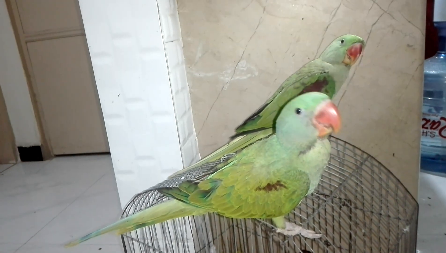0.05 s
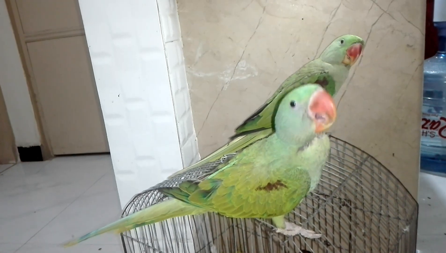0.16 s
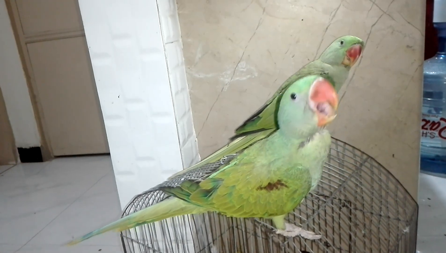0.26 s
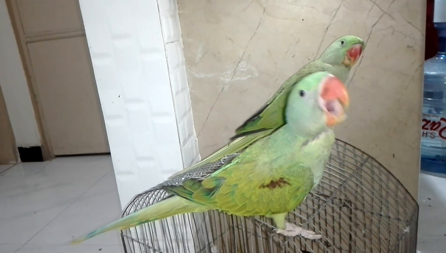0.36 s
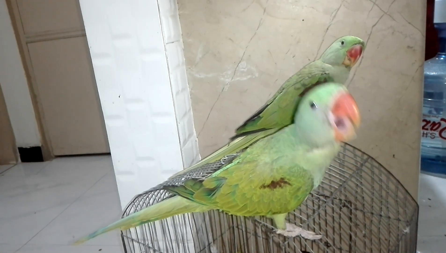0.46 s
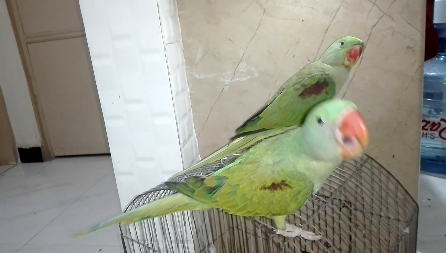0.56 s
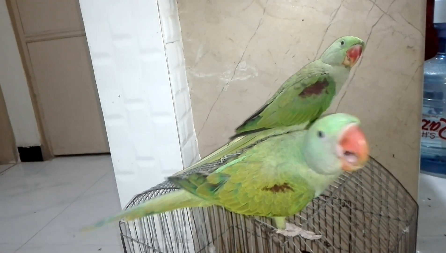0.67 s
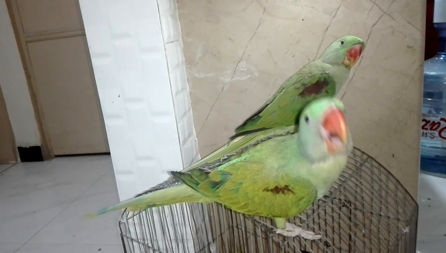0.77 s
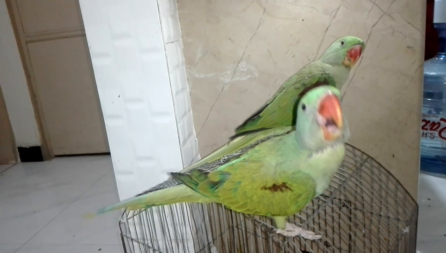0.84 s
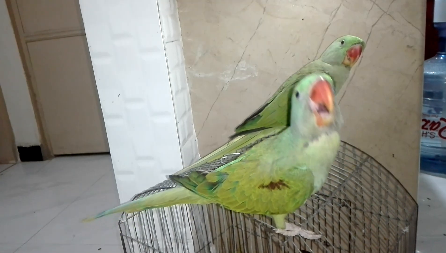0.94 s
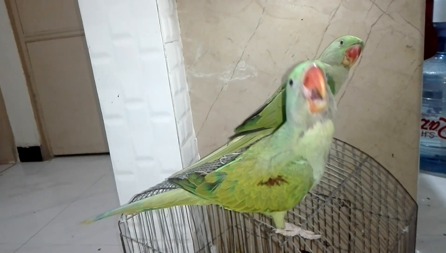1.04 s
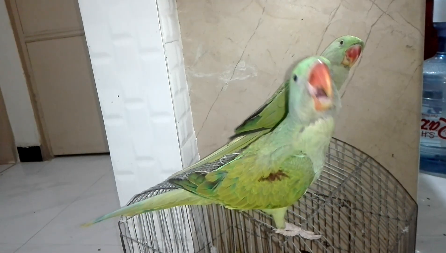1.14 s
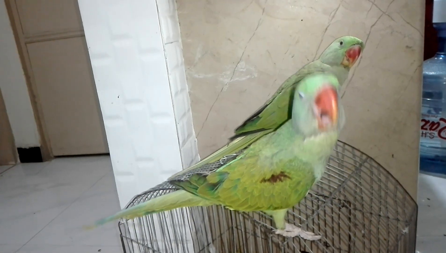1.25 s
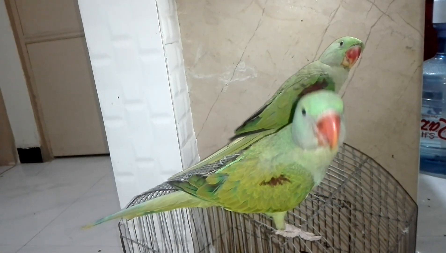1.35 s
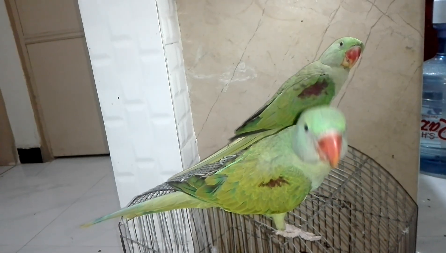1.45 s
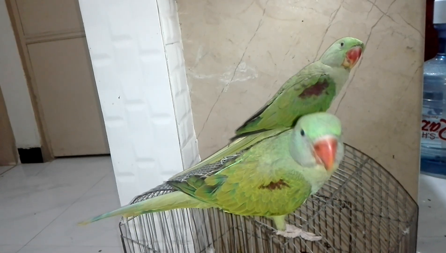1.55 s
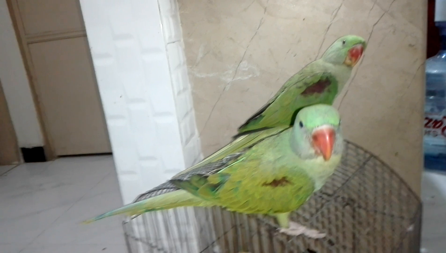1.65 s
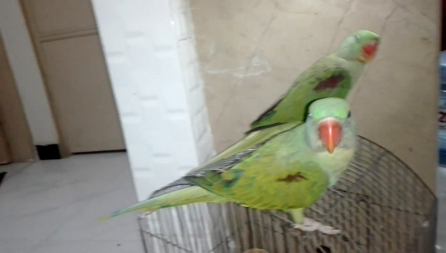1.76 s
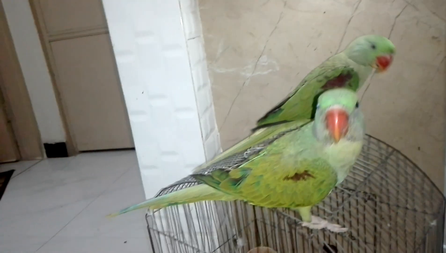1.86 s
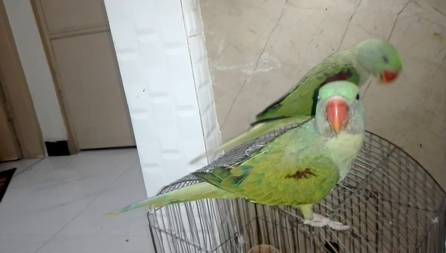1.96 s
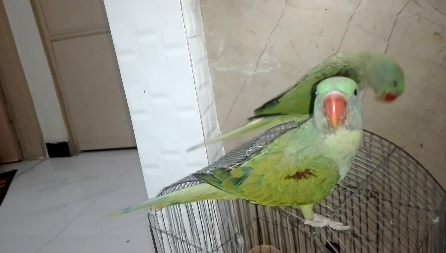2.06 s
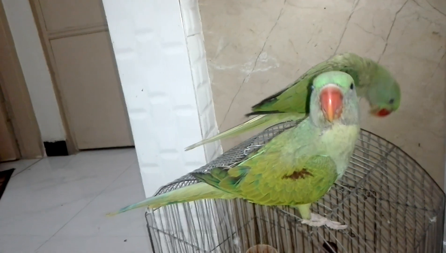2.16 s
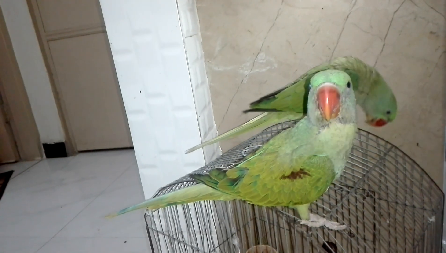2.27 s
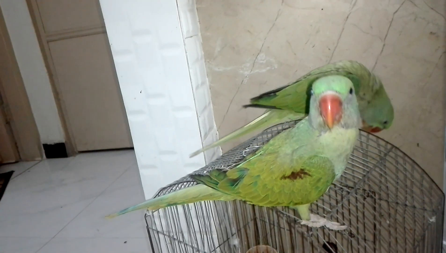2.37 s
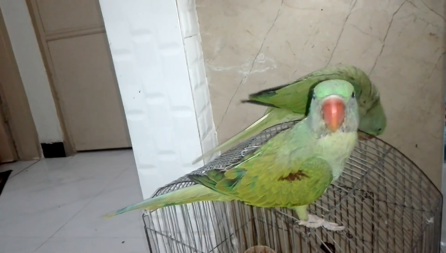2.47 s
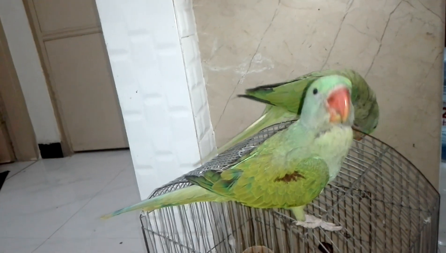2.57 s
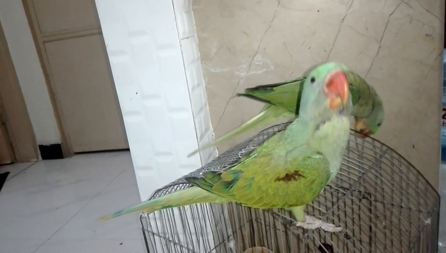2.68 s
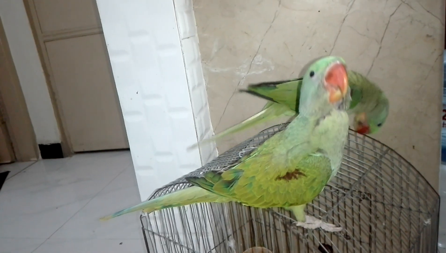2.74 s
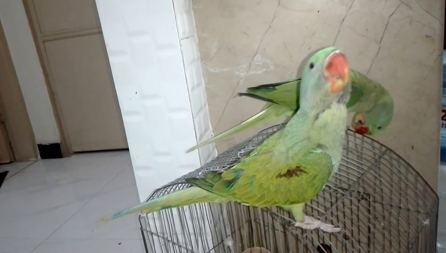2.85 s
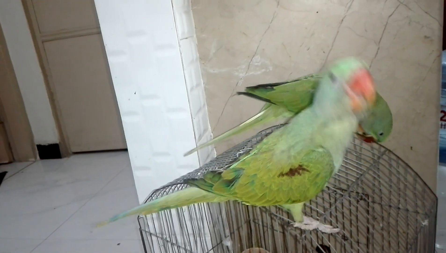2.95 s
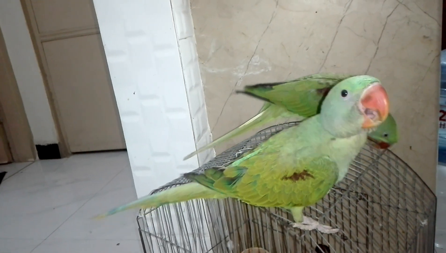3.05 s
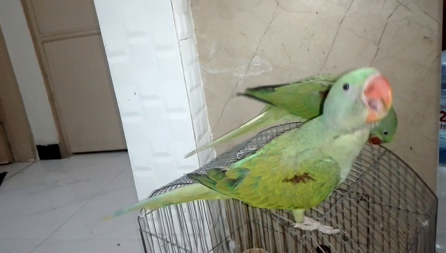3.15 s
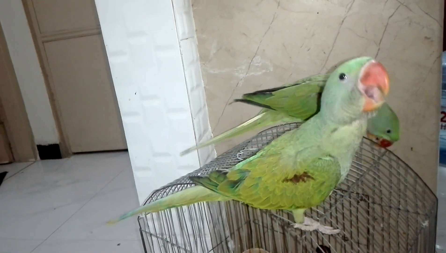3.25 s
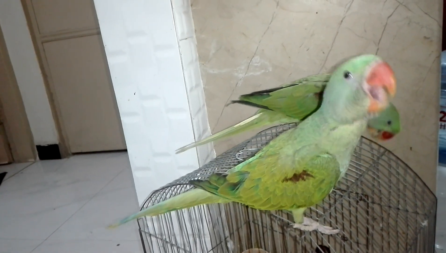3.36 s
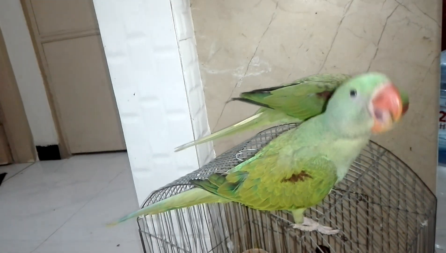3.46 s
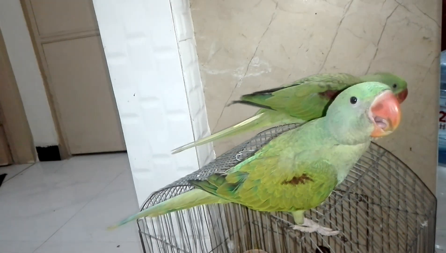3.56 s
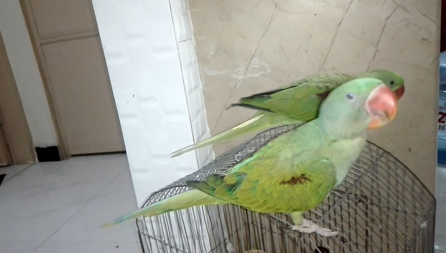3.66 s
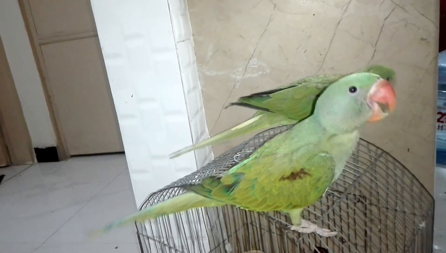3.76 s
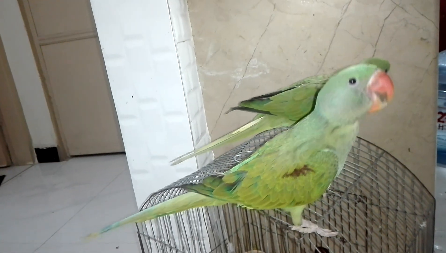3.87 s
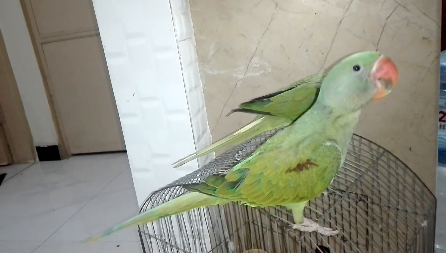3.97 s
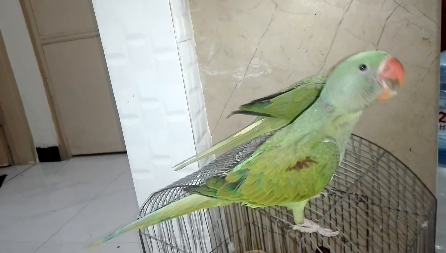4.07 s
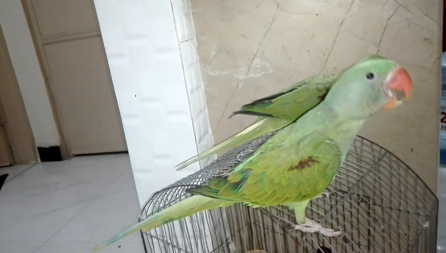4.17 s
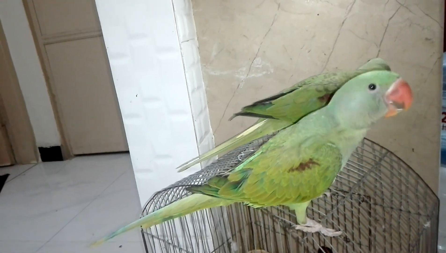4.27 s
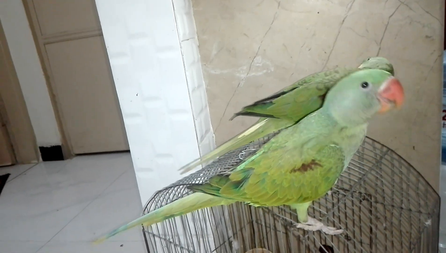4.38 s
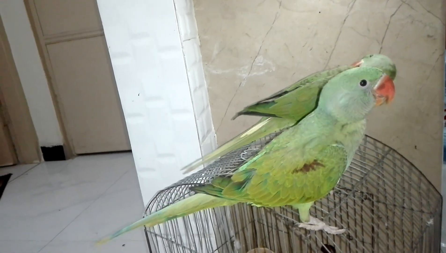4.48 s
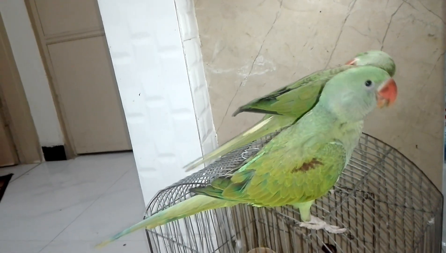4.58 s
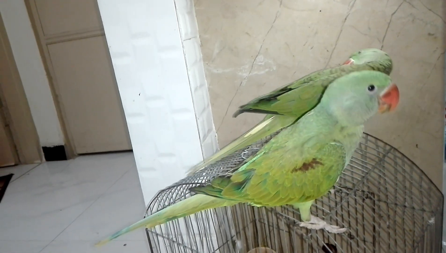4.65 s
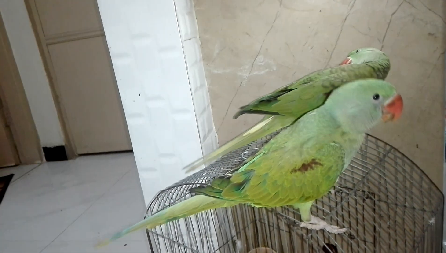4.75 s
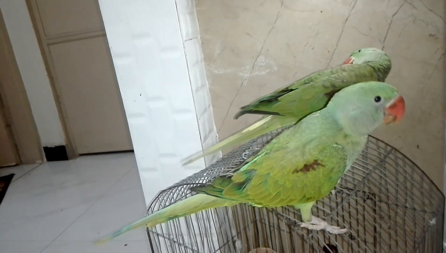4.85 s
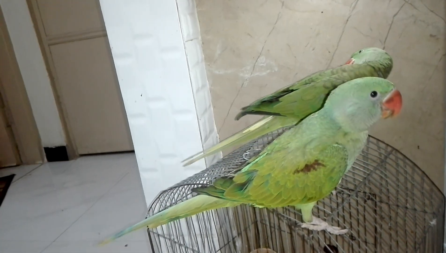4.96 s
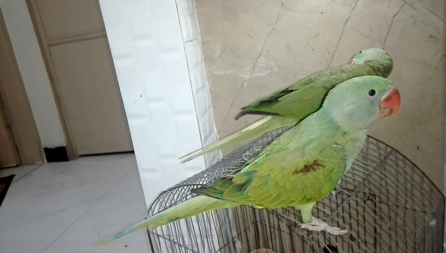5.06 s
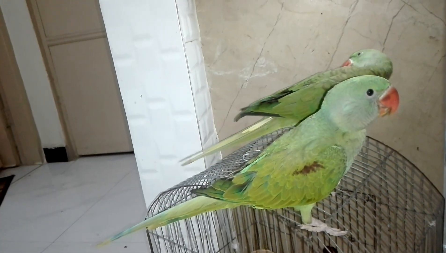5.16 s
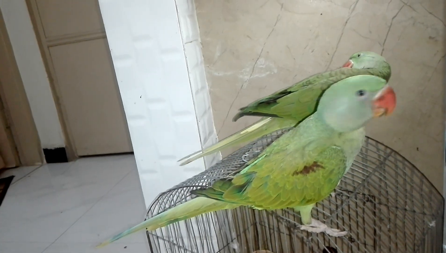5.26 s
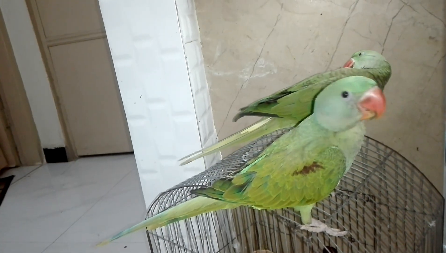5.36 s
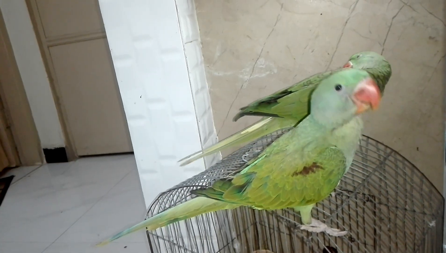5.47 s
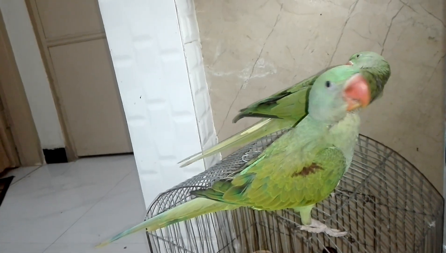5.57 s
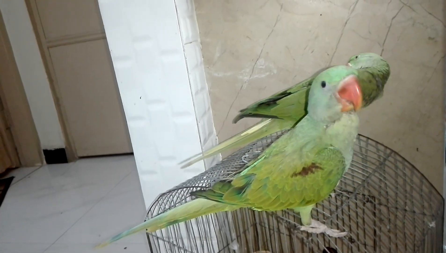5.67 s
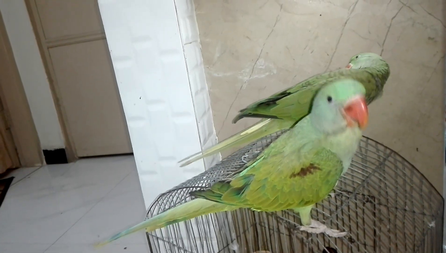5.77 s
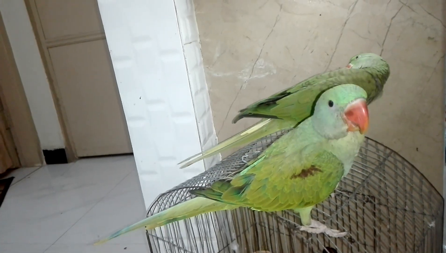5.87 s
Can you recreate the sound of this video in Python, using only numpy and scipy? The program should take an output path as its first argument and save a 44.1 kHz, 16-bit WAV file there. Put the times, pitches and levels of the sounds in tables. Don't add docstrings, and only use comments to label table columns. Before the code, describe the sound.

A small, bare tiled room with a steady low fan rush and faint motor hum throughout; uneven air rumbles softly on the close microphone. At about 0.2 s a parakeet squawks loudly: a harsh, reedy cry fluttering up and down about 26 times a second, catching and breaking off briefly near its start, then sagging in pitch and dulling by 0.63 s. A second similar squawk runs from 0.83 to 1.25 s. Hard walls ring after each. In the pause, cage wire ticks clearly at 1.74 s and faintly at 2.7 s; a weak far bird whistle sweeps upward around 2.1-2.4 s, with a soft air puff. The second pair comes at 3.07-3.53 s and 3.73-4.19 s, with a short low thump near 3.5 s. Then the fan continues, a distant whistle rises at 4.9-5.2 s, a tiny tick follows, air thumps strongly around 5.45 s, and thin far tones linger to 5.9 s.

```python
import sys
import numpy as np
from scipy import signal
from scipy.fft import rfft, irfft
from scipy.io import wavfile
from scipy.ndimage import uniform_filter1d

SR = 44100
rng = np.random.default_rng(int(sys.argv[2]) if len(sys.argv) > 2 else 0)


def master(y):
    cut = np.clip(np.atleast_2d(y).T, -1, 1)
    pcm = np.round(cut * 32767)
    wavfile.write(sys.argv[1], SR, pcm.astype(np.int16))


def volts(x):
    e = np.asarray(x, float) / 20
    return 10 ** e


N = 261072


def rms_one(x):
    return x / np.sqrt(np.mean(x ** 2) + 1e-20)


def at_hz(points, hz):
    hz_points, values = np.transpose(points)
    return np.interp(np.log(hz + 1), np.log(hz_points), values)


def wobble(size, rate_hz):
    r = np.exp(-2 * np.pi * rate_hz / SR)
    return rms_one(signal.lfilter([1], [1, -2 * r, r * r], rng.standard_normal(size + 4000))[4000:])


def fade(t, start, end, edge_s):
    return np.clip((t - start) / edge_s, 0, 1) * np.clip((end - t) / edge_s, 0, 1)


def filtered_noise(size, order, hz, kind):
    return signal.sosfilt(signal.butter(order, hz, kind, fs=SR, output="sos"), rng.standard_normal(size))


CLOSING_S = [.02, .006, .018, .025]
CLOSED_DB = -2
TIRED_BREATH = .5
HISS_DB, HISS_ABOVE_HZ, HISS_FOLLOWS = -43, 1200, 0.34


def squawk(call):
    t, share, pitch, level = voice_box(call)
    end = warble(call)[-1][0]
    shut = np.clip((t - end + CLOSING_S[call]) / .004, 0, 1)
    hoarse = .7 * np.exp(-(t - t[0]) / .006)
    phase, voice, power = 2 * np.pi * np.cumsum(pitch) / SR, 0, 1e-12
    for order in range(1, 19):
        gain = throat_and_beak(call, order, pitch, share, shut)
        breath = hoarse + .12 + (.8 + TIRED_BREATH * share) * (order * pitch / 9000) ** 2.2
        clean = (1 + breath * wobble(len(t), 220)) * np.sin(order * phase + 0.35 * order ** 2)
        grain = breath * wobble(len(t), 250) * np.cos(order * phase)
        voice = voice + gain * (clean + grain)
        power = power + gain ** 2 * (.5 + breath ** 2)
    hiss = rms_one(filtered_noise(len(t), 8, SHADOW[call][1] + HISS_ABOVE_HZ, "high"))
    hiss = volts(HISS_DB) * (level / level.max()) ** HISS_FOLLOWS * (1 - shut) * hiss
    out = np.zeros(N)
    first = round(t[0] * SR)
    out[first:first + len(t)] = level * voice / np.sqrt(power) + hiss
    return out


# start_s, end_s
BREAKS = [
    (.278, .2935),
    (.320, .3275),
    (.884, .902),
    (.922, .9425),
    (3.126, 3.1425),
    (3.166, 3.1785),
    (3.806, 3.820),
]
DWELL = [(0, 1.15), (.13, .72), (.40, .75), (.64, 2.1), (1, 2.8)]
SLACK = [0, 0, 0, .9]


def voice_box(call):
    s, hz, db = np.transpose(warble(call))
    t = np.arange(round(s[0] * SR), round(s[-1] * SR)) / SR
    k = np.clip(np.searchsorted(s, t, side="right") - 1, 0, len(s) - 2)
    swing = .5 - .5 * np.cos(np.pi * np.clip((t - s[k]) / (s[k + 1] - s[k]), 0, 1))
    rising = hz[k + 1] > hz[k]
    height = np.where(rising, swing, 1 - swing)
    share = np.clip((t - s[0]) / (s[-1] - s[0]), 0, 1)
    dwell = np.interp(share, *np.transpose(DWELL)) + SLACK[call] * (1 - share)
    bent = np.where(rising, 1 - (1 - height ** (1.25 * dwell)) ** 1.3, (1 - height ** dwell) ** 1.3)
    pitch = hz[k] * (hz[k + 1] / hz[k]) ** bent * (1.01 + .006 * wobble(len(t), 150))
    lagging = np.where(rising, height ** 2.2, 1 - height ** 1.5)
    level_db = db[k] + (db[k + 1] - db[k]) * lagging - 4.0 - 3.2 * height
    level = volts(level_db) * fade(t, s[0], s[-1], 0.002)
    for start, end in BREAKS:
        dying = np.clip((t - start) / .006 + 1, 0, 1)
        level = level * (1 - dying * np.clip((end - t) / .001 + 1, 0, 1))
    return t, share, pitch, level


# start_s, first_trough_s, warble_period_s, quickening_s (per warble squared), end_s
SQUAWKS = [
    (.198, .221, .0383, .00008, .632),
    (.829, .864, .0411, .00022, 1.251),
    (3.072, 3.108, .0393, .00014, 3.529),
    (3.733, 3.752, .0400, .000155, 4.19),
]
# first_hz, second_hz, third_hz, fourth_hz, sagging_towards_hz
TROUGHS = [(957, 1261, 1271, 1212, 955), (905, 1101, 1190, 1116, 920), (1031, 1300, 1200, 1160, 960),
           (775, 1000, 1060, 1076, 950)]
# opening_hz, highest_hz, climb_hz (per warble), sag_after_hz (per warble)
CRESTS = [(1450, 1975, 45, 92), (1339, 1870, 140, 92), (1605, 1870, 0, 76), (900, 1910, 85, 82)]
# held_db, first_trough_db, hesitation_after_db, tiring_by_end_db
EFFORT = [(-7, -11, 6, 4), (-7.5, -11.5, 3.5, 5), (-5.5, -11.5, 5, 3), (-5.5, -8.5, 2.5, 5)]
TRAIL_S = [0.0162, .003, 0.0129, 0.0046]
TRAIL_DB, OPENING_DB, DYING_DB = -39, -18, -19.5
SAG_WARBLES, DROOP, ONSET_HZ, OPENING_S = 5.0, .92, 1000, .018
CREST_AT_START, CREST_AT_END = .5, .45
RECOVER_WARBLES, TIRING_POWER = 1.6, 1.28
CREST_LOSS_DB, CREST_EARLY_DB, CREST_LATE_DB = 6.5, 10, 5
CREST_FULLEST = 0.56


def warble(call):
    start, first, period, quicken, end = SQUAWKS[call]
    *early, low_4, settle = TROUGHS[call]
    opening, high, climb, sag = CRESTS[call]
    held, first_db, hesitate, tire = EFFORT[call]
    n = np.arange(20)
    s = first + period * n - quicken * n ** 2
    n = n[s < end - period / 2.5]
    s, share = s[n], n / n[-1]
    low = np.r_[early, settle + (low_4 - settle) * np.exp(-(n[3:] - 3) / SAG_WARBLES)]
    hesitation = hesitate * np.exp(-((n - 1) / RECOVER_WARBLES) ** 2)
    low_db = np.r_[first_db, (held - hesitation - tire * share ** TIRING_POWER)[1:]]
    crest_s = s + period * (CREST_AT_START + (CREST_AT_END - CREST_AT_START) * share)
    crest = high - np.where(n < 2, climb * (2 - n), sag * (n - 2))
    late = (share - CREST_FULLEST) / np.where(share < CREST_FULLEST, CREST_FULLEST, 1 - CREST_FULLEST)
    crest_db = held - CREST_LOSS_DB - np.where(late < 0, -CREST_EARLY_DB * late, CREST_LATE_DB * late ** 2)
    rows = [(start, opening, OPENING_DB)]
    if first - start > period * .75:
        rows = [(start, ONSET_HZ, OPENING_DB), (first - OPENING_S, opening, OPENING_DB)]
    crests = [c for c in zip(crest_s, crest, crest_db) if c[0] < end - period / 4]
    rows += sorted([*zip(s, low, low_db), *crests])
    last = low[-1] * DROOP ** ((end - s[-1]) / period)
    return rows + [(end, last, DYING_DB), (end + TRAIL_S[call], 1.03 * last, TRAIL_DB)]


# pitch_hz, level_db
TRACT = [(750, -19), (1100, -15), (1800, -8), (2600, -7), (3250, 1), (3800, -8), (4450, 2), (5400, -6),
         (6500, -3), (7500, -16), (9000, -21), (11000, -28), (13000, -26), (14500, -31)]
BEAK_CAVITY_HZ = [3500, 3630, 3500, 2970]
# throat_start_hz, throat_end_hz, turned_away_db, beak_start_db, beak_end_db
HEAD = [(2690, 2040, 0.1, 2.5, 2), (2310, 2010, -0.3, 6, 5.5), (2310, 2180, 0.5, 1.5, -0.5),
        (2530, 2170, 1.35, 4.5, 2)]
# start_hz, midway_hz, reached at share (0 to 1), end_hz
SHADOW = [(10400, 11600, 0.18, 6900), (9550, 10900, 0.42, 6900), (10000, 9550, 0.59, 9300),
          (10700, 11700, 0.42, 8900)]
# share of the squawk (0 to 1), brightness_db (per octave)
GAPE = [(0, -5), (.25, 0.4), (.55, -0.83), (1, -4.5)]
# gap_start_db, gap_end_db (gap between throat and beak), shaded_start_db, shaded_end_db
TURN = [(1, 1, 2.5, -1), (3, 0.5, 3, 0), (0, 1.5, 2.5, -1.5), (-6, -2.5, 1.5, -3)]
THROAT_WIDTH_HZ, SHADED_HZ, GAP_HZ, GAP_WIDTH_HZ = 764, 5370, 2570, 300
NOTCH_WIDTH_HZ, NOTCH_DB = 750, -30
SHADE_TREBLE_DB = -5.5


def throat_and_beak(call, order, pitch, share, shut):
    throat_0, throat_1, away, cavity_0, cavity_1 = HEAD[call]
    throat = throat_0 + (throat_1 - throat_0) * share ** 0.35
    cavity_db = cavity_0 + (cavity_1 - cavity_0) * share
    notch_0, notch_top, lifted, notch_1 = SHADOW[call]
    notch = np.interp(share, [0, lifted, 1], [notch_0, notch_top, notch_1])
    gap_0, gap_1, shade_0, shade_1 = TURN[call]
    gap_db, shade_db = gap_0 + (gap_1 - gap_0) * share, shade_0 + (shade_1 - shade_0) * share
    bright = np.interp(share, *np.transpose(GAPE))
    slope = bright - (5 - 2.5 * share) * np.log2(pitch / 1000) + CLOSED_DB * shut
    f = order * pitch
    db = at_hz(TRACT, f) + slope * np.log2(order)
    db = db + NOTCH_DB * (0.5 - 0.28 * share ** 3) * np.exp(-((f - notch) / NOTCH_WIDTH_HZ) ** 2)
    db = db + cavity_db * np.exp(-((f - BEAK_CAVITY_HZ[call]) / 350) ** 2)
    db = db + shade_db * np.exp(-((f - SHADED_HZ) / 900) ** 2)
    db = db + gap_db * np.exp(-((f - GAP_HZ) / GAP_WIDTH_HZ) ** 2)
    db = db + SHADE_TREBLE_DB * away * np.clip(f / 4000 - 2, 0, 1)
    throat_gain = 0.11 + 1 / (1 + ((f - throat) / THROAT_WIDTH_HZ * 2) ** 2)
    return volts(db) * throat_gain * (f < 16000)


# start_s, peak_db, pitch_hz, length_s
TICKS = [
    (1.739, -41.5, 3680, 0.0055),
    (2.692, -51, 5600, 0.005),
    (5.1941, -56, 2280, 0.0073),
]


def ticks():
    out = np.zeros(N)
    for s, db, hz, length in TICKS:
        t = np.arange(2000) / SR
        burst = rms_one(filtered_noise(len(t), 3, [2300, 1.04 * hz + 400], "band"))
        out[round(s * SR):round(s * SR) + len(t)] += volts(db - 1) * burst * np.exp(-t / length)
    return out


# time_s, pitch_hz, level_db
WHISTLES = [
    [(2.14, 3150, -67), (2.22, 3030, -50), (2.30, 3120, -55), (2.36, 3720, -48.5), (2.39, 4170, -46)],
    [(4.88, 2760, -44), (4.95, 2760, -48), (5.08, 2950, -46), (5.13, 3270, -49), (5.18, 3730, -46)],
    [(5.35, 3600, -57), (5.55, 3650, -62), (5.92, 3600, -60)],
    [(5.33, 3150, -61), (5.7, 3200, -55), (5.92, 3250, -55)],
]


def whistles():
    out = np.zeros(N)
    for rows in WHISTLES:
        s, hz, db = np.transpose(rows)
        span = np.arange(round(s[0] * SR), min(N, round(s[-1] * SR)))
        t = span / SR
        pitch = np.interp(t, s, hz) * (1 + .009 * wobble(len(span), 70))
        level_db = np.interp(t, s, db) - 8 + 5 * wobble(len(span), 40)
        level = volts(level_db) * fade(t, s[0], s[-1], .01)
        out[span] += level * np.sin(2 * np.pi * np.cumsum(pitch) / SR)
    return out


# pitch_hz, time_to_fall_60_db_s
ROOM = [(1000, .8), (3000, .75), (6000, .6), (11500, .16)]
ROOM_DB, EARLY_DB = -15.5, -23


def room(x):
    t = np.arange(SR) / SR
    tail, edges = 0, [300, 1500, 2600, 4500, 8000, 16000]
    for low, high in zip(edges, edges[1:]):
        tail = tail + filtered_noise(SR, 2, [low, high], "band") * volts(-60 * t / at_hz(ROOM, np.sqrt(low * high)))
    tail = tail * np.clip((t - .006) / 0.014, 0, 1)
    tail = volts(ROOM_DB) * tail / np.sqrt(np.sum(tail ** 2))
    early = (SR * np.array([.0031, .0058, .0092, .0135])).astype(int)
    tail[early] += volts(EARLY_DB) * np.array([-0.049, -1.3, -0.27, -1.85])
    return signal.fftconvolve(x, tail)[:N]


# pitch_hz, level_db (per Hz)
FAN = [(24, -41), (40, -28), (64, 2.5), (211, -9), (306, -5.5), (364, -12.5), (454, -16.5), (568, -22),
       (910, -16.5), (1530, -18.5), (2390, -30), (2850, -29), (4340, -39), (13600, -49), (15000, -60)]
# pitch_hz, level_db
HUM = [(128, -58), (165, -49.5), (265, -53)]
FAN_DB = -39


def fan():
    shaped = irfft(rfft(rng.standard_normal(N)) * volts(at_hz(FAN, np.fft.rfftfreq(N, 1 / SR))), N)
    waver = np.cumsum(1 + 0.02045 * wobble(N, 4.45)) / SR
    hum = sum(volts(db) * np.sin(2 * np.pi * hz * waver) for hz, db in HUM)
    return volts(FAN_DB + 0.78 * wobble(N, 6.6)) * rms_one(shaped) + volts(3.0 * wobble(N, 7.2)) * hum


# peak_time_s, peak_db
GUSTS = [(.03, -27.5), (.43, -39), (0.639, -31), (1.0, -47), (2.34, -31), (2.722, -40), (3.05, -33),
         (3.498, -28), (3.64, -35.5), (3.95, -37), (4.63, -53), (5.44, -32)]
# start_s, peak_db, length_s
PUFFS = [
    (.63, -27, .012),
    (2.34, -25, .012),
    (3.484, -19, .005),
    (5.432, -16, .018),
    (5.488, -12, .004),
]
GUST_S, CALM_DB, CALM_SWING_DB, PUFF_CUT_HZ = 0.044, -39, 1, 260


def buffeting():
    t = np.arange(N) / SR
    low = filtered_noise(N, 1, [11, 60], "band")
    gusts = sum(volts(db) * np.exp(-((t - s) / GUST_S) ** 2) for s, db in GUSTS)
    coarse = N // 20 + 1
    calm = np.interp(t, np.arange(coarse) * 20 / SR, wobble(coarse, 80))
    out = (volts(CALM_DB + CALM_SWING_DB * calm) + gusts) * rms_one(low)
    for s, db, length in PUFFS:
        u = np.clip((t - s) / length, 0, 30)
        out = out + volts(db) * 6 * u * (1 - u) * np.exp(-1.6 * u)
    return signal.sosfilt(signal.butter(3, PUFF_CUT_HZ, fs=SR, output="sos"), out)


def scene():
    bird, far = sum(squawk(call) for call in range(len(SQUAWKS))) + ticks(), whistles()
    turn_s = np.array(SQUAWKS)[:, [0, -1]].ravel()
    away = volts(np.interp(np.arange(N) / SR, turn_s, np.repeat(np.array(HEAD)[:, 2], 2)))
    mono = bird / away ** 0.94 + far + room(bird * away + volts(2.5) * far) + fan() + buffeting()
    return np.array([mono, mono])


def treble_spread(x, share=0.41, spread_db=-5.5):
    side, edges, patches = 0, [3800, 5400, 7000, 8600, 10200, 12000, 14600], N // 1024 + 2
    for k, (low, high) in enumerate(zip(edges, edges[1:])):
        band = signal.butter(3, [low, high], "band", fs=SR, output="sos")
        size = np.sqrt(uniform_filter1d(signal.sosfilt(band, x) ** 2, size=300) + 1e-14)
        chosen = uniform_filter1d(rng.random(patches), size=2) < share - (k == 0) * .2
        gate = np.interp(np.arange(N) / 1024, np.arange(patches), chosen)
        side = side + volts(spread_db) * gate * size * rms_one(signal.sosfilt(band, rng.standard_normal(N)))
    return side


CUTOFF_HZ = 14450


def band_limit(x):
    return signal.sosfilt(signal.butter(12, 15300, fs=SR, output="sos"), x)


def record(dry):
    wet = dry + treble_spread(dry[0]) * [[1], [-1]]
    wet = signal.sosfilt(signal.cheby2(12, 50, CUTOFF_HZ + 350, fs=SR, output="sos"), wet)
    return band_limit(wet)


dry = scene()
out = record(dry)
master(out)
```